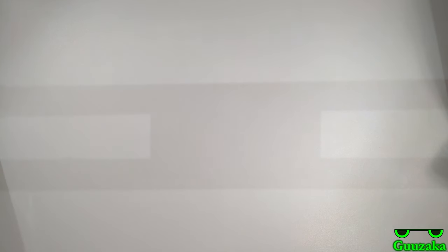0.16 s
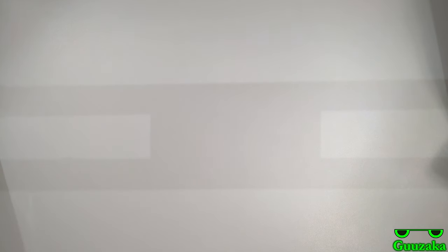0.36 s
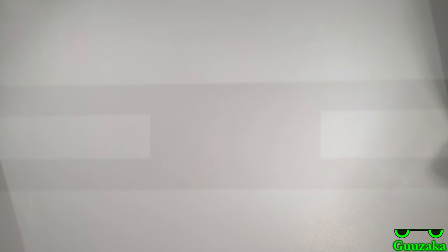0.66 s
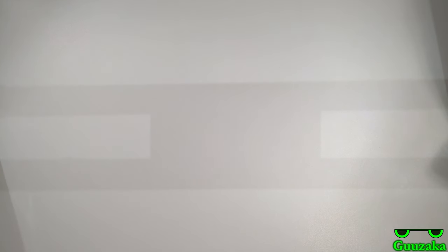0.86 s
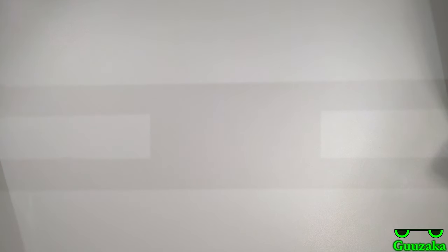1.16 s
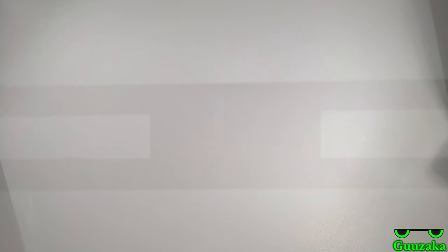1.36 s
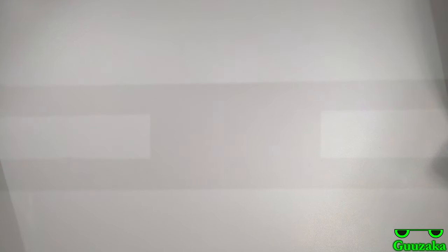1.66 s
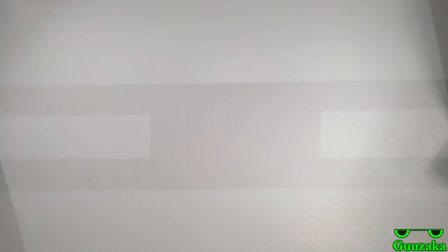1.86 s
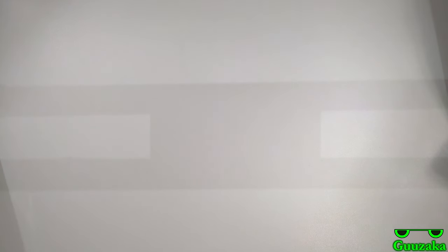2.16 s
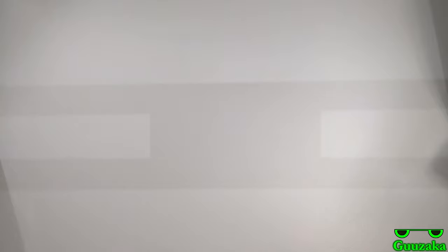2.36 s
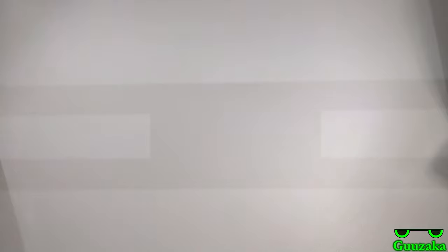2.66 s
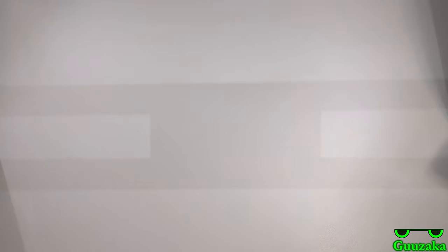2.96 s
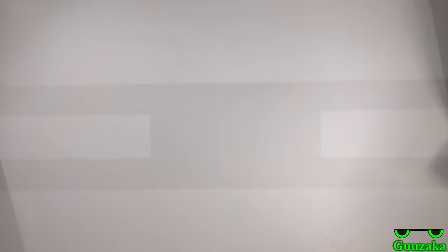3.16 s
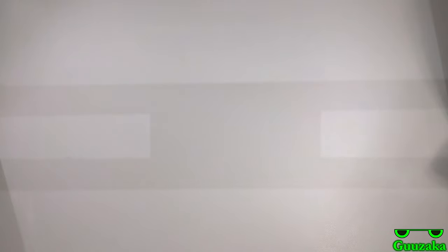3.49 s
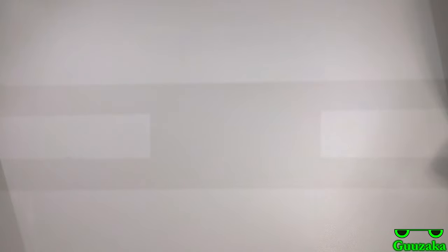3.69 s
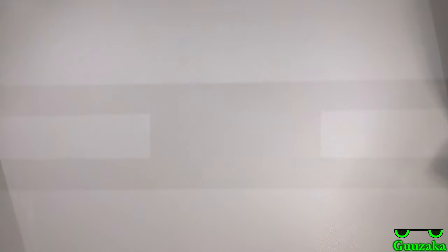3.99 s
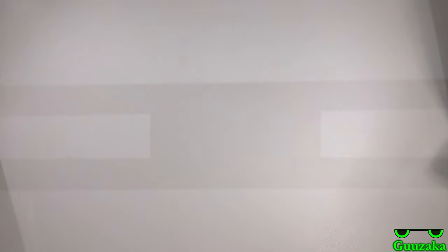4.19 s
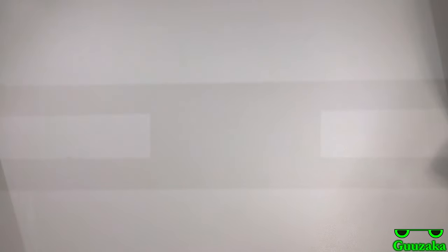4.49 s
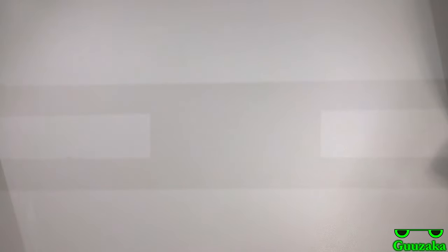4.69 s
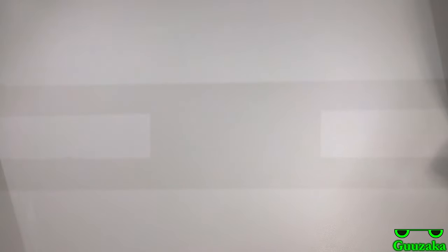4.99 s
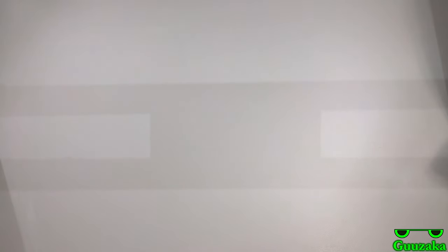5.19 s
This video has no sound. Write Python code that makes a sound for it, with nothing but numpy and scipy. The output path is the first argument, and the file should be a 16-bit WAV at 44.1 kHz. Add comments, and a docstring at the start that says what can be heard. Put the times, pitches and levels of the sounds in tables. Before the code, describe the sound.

Close, dry rustle and tapping of hollow card boxes, quiet at first, a loud thud midway, then a flurry of knocks.

```python
"""Cardboard boxes on a table

Close stereo microphone in a small room; the boxes are handled on a table a little to its right.
Card slides and scuffs over card: filtered grains of noise that follow each stroke of the hand.
Fingers and corners bump the hollow walls, and one box lands with a heavy, rattling thump: damped modes
of box and table with short bursts of grains. Brief squeaks, a low murmur and faint room air lie beneath."""
import sys
import numpy as np
from scipy import signal
from scipy.fft import rfft, irfft
from scipy.io import wavfile

SR = 44100
rng = np.random.default_rng(int(sys.argv[2]) if len(sys.argv) > 2 else 0)


def put_to_file(sound):
    """Save the sound as 16-bit audio at rate SR, in the file named by the first command-line argument."""
    columns = np.atleast_2d(sound).T  # one column per channel
    safe = np.clip(columns, -1, 1)
    whole_steps = np.round(safe * 32767)
    wavfile.write(sys.argv[1], SR, whole_steps.astype(np.int16))


N = 235714
TIME = np.arange(N) / SR


def undb(db):
    """Decibels to gain."""
    return 10 ** (np.asarray(db) / 20)


def along(points, hz):
    """Read (Hz, value) points on a log-frequency axis."""
    point_hz, value = np.transpose(points)
    return np.interp(np.log(np.maximum(hz, 1)), np.log(point_hz), value)


def colour(x, points, size=2048):
    """Causal minimum-phase filter of the given colour that keeps the power of white noise."""
    log_gain = along(points, np.fft.rfftfreq(size, 1 / SR)) * np.log(10) / 20
    cepstrum = irfft(log_gain)
    # folding the cepstrum forward in time makes the filter causal
    cepstrum[1:size // 2] *= 2
    cepstrum[size // 2 + 1:] = 0
    response = irfft(np.exp(rfft(cepstrum)))
    response /= np.linalg.norm(response)
    return signal.fftconvolve(x, response[None])[:, :x.shape[1]]


def place(x, pan_db):
    """Share a sound between left and right; pan_db is left minus right."""
    gains = np.array([undb(pan_db / 2), undb(-pan_db / 2)]).reshape(2, -1)
    return x * gains / gains.mean(axis=0)


def add(track, start_s, x):
    """Mix x into the track from start_s on."""
    i = max(int(start_s * SR), 0)
    track[:, i:i + x.shape[1]] += x[:, :max(N - i, 0)]


def walk(rate):
    """Smooth random wandering, spread near 1, with `rate` new values a second."""
    knots = rng.standard_normal(N // 20)
    return np.interp(TIME * rate, np.arange(len(knots)), knots)


def grains(count, spread_db):
    """Dense tiny slips of paper fibres, a few far larger than the rest; rms 1."""
    size_db = spread_db * np.minimum(rng.exponential(size=count), 6)
    x = rng.standard_normal(count) * undb(size_db)
    return x / x.std()


def ring(hz, db, t60, t, rise_s):
    """Damped modes set going by a soft push; unit power before the decay and the push."""
    gain = undb(db)[:, None]
    decay = np.exp(-np.log(1000) * t / t60[:, None])
    waves = gain * np.sin(2 * np.pi * hz[:, None] * t) * decay
    push = 1 - np.exp(-t / rise_s)
    return waves.sum(axis=0) * push / np.sqrt(np.sum(gain ** 2) / 2)


def diffuse(count, alike_hz):
    """Noise from all round: the two ports share its bass but not its treble."""
    mid, side = rfft(rng.standard_normal((2, count)))
    alike = 1 / (1 + (np.fft.rfftfreq(count, 1 / SR) / alike_hz) ** 2)
    mid = mid * np.sqrt((1 + alike) / 2)
    side = side * np.sqrt((1 - alike) / 2)
    return irfft(np.array([mid + side, mid - side]), count)


def room(x, wet_db, lowest_hz=140, size=256):
    """Direct sound and a short dense tail from near, bare walls."""
    # decay time of the tail: band_hz, t60_s
    room_t60 = [(100, 0.28), (500, 0.13), (2000, 0.17), (5000, 0.17), (15000, 0.18)]
    hz, t, bands = signal.stft(diffuse(SR // 2, alike_hz=417), SR, nperseg=size)
    decay = np.exp(-np.log(1000) * t / along(room_t60, hz)[:, None])
    tail = signal.istft(bands * decay, SR)[1]
    tail *= 1 - np.exp(-np.arange(tail.shape[1]) / SR / 0.00092)  # builds up with a time constant near 1 ms
    # the room is too small to scatter the deepest bass
    tail = signal.sosfilt(signal.butter(2, lowest_hz, "high", fs=SR, output="sos"), tail)
    response = undb(wet_db) * tail / np.linalg.norm(tail[0])
    response[:, 0] += 1  # direct sound
    return signal.fftconvolve(x, response / np.linalg.norm(response[0]), axes=1)[:, :N]


def spread(source, wet_db, count=3):
    """A box touches at several spots, each with its own path through the room."""
    return sum(room(source(), wet_db) for _ in range(count)) / np.sqrt(count)


def still_air(level_db=-66.5):
    """Still room air: faint steady noise from all round, fuller in the bass than in the treble."""
    # colour of the air: band_hz, relative_density_db
    air_colour = [(15, -44), (25, 0.5), (116, -5), (537, -11), (666, -12.5), (871, -19), (1410, -20),
                  (2560, -22.5), (3090, -23), (3340, -21.5), (6730, -26.5), (15500, -25)]
    return undb(level_db) * colour(diffuse(N, alike_hz=473), air_colour)


def grip(murmur_db=1, waver_db=3):
    """Skin creeps on the card in fits and starts; only the low walls pass it on."""
    # murmur of the held box, before murmur_db and the wavering: time_s, level_db
    hold_levels = [(0.0, -59.5), (0.37, -61.5), (0.86, -74.5), (1.04, -66), (1.27, -62.5), (2.5, -86),
                   (3.19, -71), (3.32, -72), (3.44, -64), (3.49, -62.5), (3.8, -68), (4.02, -80),
                   (4.2, -63), (4.33, -62), (4.62, -45), (4.85, -71), (5.03, -86), (5.25, -74)]
    # what the walls pass on: band_hz, relative_level_db
    murmur_colour = [(25, 1.5), (70, 1.5), (110, -10.5), (170, -1.5), (250, -6), (380, -16), (700, -23),
                     (2000, -44)]
    pressure_db = np.interp(TIME, *np.transpose(hold_levels)) + murmur_db + waver_db * walk(rate=20)
    creep = undb(pressure_db) * grains(N, spread_db=6.5)
    return colour(place(creep, 0), murmur_colour)


def squeaks():
    """A fingertip sticks and slips quickly on glossy card, singing in a few narrow bands."""
    # squeaks: start_s, level_db, length_s
    squeak_times = [(2.773, -52.5, 0.043), (2.925, -83, 0.026)]
    # narrow resonances: centre_hz, width_hz, relative_level_db
    squeak_tones = [(2430, 1700, -2), (4130, 530, -1), (4880, 1300, -2.5), (12850, 540, -1.5)]
    hz = np.fft.rfftfreq(N, 1 / SR)
    shape = sum(undb(db) / (1 + (2 * (hz - centre) / width) ** 2) for centre, width, db in squeak_tones)
    song = irfft(rfft(rng.standard_normal(N)) * shape, N)
    press = sum(undb(db) * np.sin(np.pi * np.clip((TIME - start) / length, 0, 1))
                for start, db, length in squeak_times)
    return place(press * song / song.std(), -2.5)


def stroke(attack, hold, release):
    """The hand speeds up, holds its speed and lets the motion die away."""
    t = TIME[TIME < attack + hold + release]
    rise = np.sin(np.pi / 2 * np.minimum(t / attack, 1)) ** 2
    return rise * np.exp(-np.log(1000) * np.maximum(t - attack - hold, 0) / release)


def slides(rasp_db=0, hollow_db=-1, hiss_db=0, judder_db=-1.5):
    """Card drags unevenly over card: fibres rasp and hiss, and the hollow box resounds at its opening's pitch."""
    # strokes of card on card, levels before the trims above: start_s, attack_s, hold_s, release_t60_s,
    # rasp_db, hollow_db, hollow_pitch_hz, fine_hiss_db, left_minus_right_db
    strokes = [(0, 0.0033, 0.1, 0.31, -64, -68.5, 890, -66, -2),
               (0.119, 0.061, 0.027, 0.23, -53, -52, 1170, -54.5, -2),
               (0.196, 0.065, 0.053, 0.13, -58, -53.5, 980, -61, 0.5),
               (0.429, 0.011, .11, 0.25, -64, -91, 890, -50.5, 0),
               (.482, 0.011, 0.014, 0.12, -59, -52.5, 810, -57, 0),
               (0.648, 0.021, .005, 0.19, -67, -43.5, 940, -61, -3),
               (0.712, 0.041, 0.0046, 0.31, -53.5, -69, 890, -61.5, -1),
               (0.821, 0.037, .015, 0.68, -50.5, -66.5, 885, -52.5, -1),
               (0.945, 0.28, 0.052, 1.1, -58, -66, 900, -58.5, -2),
               (1.333, 0.32, 0.38, .15, -64, -75, 890, -65, -4),
               (1.72, 0.11, 0.033, 0.36, -58, -73, 890, -71, 2),
               (1.926, 0.039, 0.011, .15, -67, -80, 890, -68, 1),
               (2.003, 0.13, 0.063, 0.67, -70.5, -73, 870, -71.5, -1),
               (2.384, 0.037, 0.0085, 0.27, -52.5, -49.5, 960, -54, -3.5),
               (2.84, 0.046, 0.018, 0.55, -79, -68.5, 940, -76, 1),
               (3.273, 0.033, .005, 0.093, -43.5, -30.5, 1010, -34, 1.5),
               (3.308, 0.036, .005, 0.16, -41.5, -34.5, 1020, -60, 5),
               (3.466, 0.032, .01, 0.27, -62.5, -69, 890, -71, 0),
               (3.532, 0.037, 0.0089, .22, -55, -43, 940, -51.5, -1.5),
               (3.682, 0.12, .1, 0.36, -60, -53, 930, -56, -3.5),
               (3.762, 0.081, .03, 0.23, -47.5, -49, 1050, -43, 1),
               (3.977, 0.037, 0.0069, 0.084, -65, -51.5, 940, -58, -3),
               (4.133, .03, 0.31, .3, -65, -58, 816, -66, -1),
               (4.249, 0.027, .015, 0.11, -59, -44, 810, -77, 5),
               (4.454, 0.063, 0.09, 0.34, -56, -52, 845, -65, -3),
               (4.541, 0.09, 0.014, 0.35, -49, -42, 820, -45.5, 1),
               (4.679, 0.011, 0.0042, 0.14, -59, -61, 855, -40.5, -2),
               (4.793, 0.04, 0.24, 0.71, -74, -78.5, 850, -69, 0.5),
               (5.206, 0.043, 0.0045, 0.15, -63, -61.5, 900, -59.5, -3)]
    # colours of rasp, hollow box (as it sounds at hollow_ref_hz) and hiss: band_hz, relative_level_db
    rasp_colour = [(500, -37.5), (1400, -6), (2200, 0.5), (3600, 2.5), (5200, 0), (7000, -6), (10000, -16),
                   (16000, -44)]
    hollow_colour = [(120, -8), (300, -12), (500, -6.5), (720, 3.5), (890, 4.5), (1020, 1), (1140, 2.5),
                     (1400, -4), (2200, -11.5), (5000, -34.5)]
    hiss_colour = [(2500, -32), (6000, -4.5), (8000, -4.5), (10500, -1.5), (12800, 1.5), (15500, -1.5)]
    hollow_ref_hz = 890
    out = np.zeros((2, N))
    drag = undb(judder_db * walk(rate=150))
    fibres = [drag * grains(N, spread_db=6.0) for _ in range(3)]
    for start, attack, hold, release, coarse_db, box_db, box_hz, fine_db, pan_db in strokes:
        speed = stroke(attack, hold, release)
        span = (int(start * SR) + np.arange(len(speed))) % N
        hollow = np.array(hollow_colour) * [box_hz / hollow_ref_hz, 1]
        voices = [(rasp_colour, coarse_db + rasp_db),
                  (hollow, box_db + hollow_db),
                  (hiss_colour, fine_db + hiss_db)]
        rub = sum(colour(undb(db) * speed * slips[None, span], shape)
                  for slips, (shape, db) in zip(fibres, voices))
        add(out, start, place(rub, pan_db))
    return out


def blows():
    """Each knock is a first contact and a second some 9 to 40 ms later, often much weaker."""
    # knocks, levels of the first contact before later trims: start_s, wall_db, thud_db, clack_db,
    # clack_pitch_hz, tick_db, second_delay_s, second_minus_first_db (before the shifts below)
    knocks = [(.116, -53, -60, -65, 520, -59, 0.016, -12), (.25, -55, -50, -70, 520, -70, 0.021, -4),
              (.337, -44.5, -59, -53, 530, -59.5, 0.012, -28), (0.546, -59, -48, -80, 600, -78, 0.015, -9),
              (.66, -44.5, -47, -41.5, 930, -44.5, 0.023, 2), (0.826, -54, -67, -72, 600, -66, 0.013, -16),
              (1.05, -48, -45, -42, 780, -33, 0.02, -2.5), (1.207, -39, -33.5, -47.5, 850, -63, .019, 4),
              (1.361, -43.5, -60.5, -57.5, 704, -80, .014, -10), (1.946, -53, -82, -68, 585, -63, .03, 1),
              (2.17, -57.5, -72, -67, 553, -78, 0.023, -5), (2.333, -44, -52.5, -55, 670, -50, 0.022, 2.5),
              (2.74, -56, -49.5, -56.5, 1030, -65.5, 0.021, 0.5),
              (2.795, -62, -49.5, -70, 900, -63, .016, -7.5),
              (2.9, -55.5, -60.5, -69, 700, -80, 0.015, -9.5), (3.047, -50.5, -80, -68, 495, -77, .014, -5),
              (3.094, -58, -55, -62.5, 750, -62.5, 0.012, -6.5),
              (3.276, -21.5, -26, -39.5, 556, -49, 0.0089, 6),
              (3.297, -10.5, -16, -22.5, 910, -35, 0.0087, -3.5),
              (3.319, -19, -24.5, -32, 890, -31, .018, 0.5), (3.384, -35, -23, -45, 680, -42.5, .04, -10.5),
              (3.549, -42, -43.5, -42, 944, -40, .014, 4.5),
              (3.664, -43.5, -58, -58, 700, -60, 0.013, -6.5), (3.8, -47.5, -79, -57, 495, -69, 0.016, -16),
              (4.145, -36.5, -41.5, -44.5, 660, -52, .019, 3),
              (4.222, -42, -47, -39.5, 600, -61, 0.019, -3),
              (4.277, -31.5, -39.5, -29.5, 640, -53.5, .014, -10),
              (4.344, -62, -36.5, -70, 600, -71, 0.017, -8),
              (4.382, -31, -35, -45.5, 685, -76, .014, -10.5),
              (4.427, -39.5, -68, -49.5, 625, -75, 0.015, -13),
              (4.54, -25.5, -35.5, -35.5, 540, -47.5, .018, -3.5),
              (4.624, -37.5, -35.5, -41, 704, -43.5, .014, -12),
              (4.689, -42, -36.5, -57, 700, -52, 0.015, -18),
              (4.728, -40.5, -33.5, -41.5, 720, -75, 0.016, -13),
              (4.777, -41.5, -53, -50.5, 670, -70, 0.015, -16),
              (5.223, -48, -40.5, -77.5, 700, -60, .014, -16),
              (5.279, -42.5, -42, -46.5, 550, -63, 0.011, -6), (5.31, -20, -40, -28.5, 534, -51, .014, -3)]
    flex_hz, flex_scatter = 59.8, 0.16  # mean pitch at which a box flexes, its spread from spot to spot (share)
    # the second contact has relatively more thud and less tick
    second_thud_db, second_clack_db, second_tick_db = 5, 1, -2.5
    rows = []  # (s, wall dB, thud dB, thud Hz, clack dB, clack Hz, tick dB)
    for start, wall_db, thud_db, clack_db, clack_hz, tick_db, delay, second_db in knocks:
        first_hz, second_hz = flex_hz * (1 + flex_scatter * rng.standard_normal(2))
        rows.append((start, wall_db, thud_db, first_hz, clack_db, clack_hz, tick_db))
        rows.append((start + delay, wall_db + second_db, thud_db + second_db + second_thud_db, second_hz,
                     clack_db + second_db + second_clack_db, clack_hz, tick_db + second_db + second_tick_db))
    return rows


def contacts(clack_db=3, tick_db=3, clack_s=0.01, tick_s=0.01, pan_db=-2):
    """Card crunches briefly where it is struck: a dull clack and a sharp tick."""
    # colour of a clack: multiple_of_its_pitch, relative_level_db
    clack_colour = [(.3, -10), (.65, -7), (1, 1.5), (1.45, -5), (2.1, -14.5), (4, -20), (9, -46.5)]
    # colour of a tick: band_hz, relative_level_db
    tick_colour = [(700, -24), (1500, -2), (2300, 2.5), (3400, 0), (5000, -4.5), (8000, -12), (11000, -16),
                   (15500, -20.5)]
    out = np.zeros((2, N))
    t = np.arange(SR // 8) / SR
    for start, _, _, _, dull_db, clack_hz, sharp_db in blows():
        clack = undb(dull_db + clack_db) * grains(len(t), spread_db=2.5) * np.exp(-t / clack_s)
        tick = undb(sharp_db + tick_db) * grains(len(t), spread_db=7.5) * np.exp(-t / tick_s)
        dull = colour(place(clack, pan_db), np.array(clack_colour) * [clack_hz, 1])
        sharp = colour(place(tick, pan_db), tick_colour)
        add(out, start, dull + sharp)
    return out


def bodies(flex_s=0.012, flex_db=-1, table_db=-3.0, wall_db=-3, wall_t60=0.14, scatter_db=4.5,
           detune=0.013, hardness=0.27, soft_db=-10):
    """Each blow flexes the box, shakes the table and rings the hollow walls."""
    # hollow box, before tilt, scatter and detuning: mode_hz, relative_level_db
    box_modes = [(146, 2.5), (189, -0.5), (229, 1), (262, -3), (291, -6), (358, -4.5), (404, -4.5),
                 (487, -8.5), (545, -10), (623, -10.5), (714, -10.5), (800, -12.5), (952, -30),
                 (1148, -29.5)]
    # table top: mode_hz, relative_level_db, t60_s
    table_modes = [(63.5, 0, .45), (80.5, -6, .3), (147, -13, .24)]
    out = np.zeros((2, N))
    t = np.arange(SR // 2) / SR
    table = ring(*np.transpose(table_modes), t, rise_s=0.011)
    mode_hz, mode_db = np.transpose(box_modes)
    octaves = np.log2(mode_hz / mode_hz[0])
    t60 = wall_t60 * 0.98 ** octaves  # card damps its upper modes sooner
    for start, ring_db, thud_db, thud_hz, clack_db, _, _ in blows():
        flex = np.sin(2 * np.pi * thud_hz * t) * t / flex_s * np.exp(1 - t / flex_s)
        # harder blows reach the upper modes; spot and hold shift their weights and pitches
        tilt_db = hardness * (clack_db - ring_db - soft_db) * octaves
        spot, hold = rng.standard_normal((2, len(octaves)))
        swing = rng.choice([-1, 1], len(octaves))  # each mode starts inwards or outwards
        wall_hz = swing * mode_hz * (1 + detune * hold)
        walls = ring(wall_hz, mode_db + tilt_db + scatter_db * spot, t60, t, rise_s=0.0014)
        thud = undb(flex_db) * flex + undb(table_db) * table
        add(out, start, place(undb(thud_db) * thud + undb(ring_db + wall_db) * walls, 0))
    return out


def scene():
    """Knocks, slides, squeaks and the murmur of the grip in the room, over faint still air."""
    air = still_air()
    murmur_and_bodies = room(bodies() + grip(), wet_db=-2)
    crunches = spread(contacts, wet_db=9.5)
    rubbing = spread(slides, wet_db=7.0)
    return murmur_and_bodies + crunches + rubbing + room(squeaks(), wet_db=6) + air


def record(dry):
    """The left port lies in the treble shadow of the microphone housing; the top is cut steeply."""
    # response of the shaded left port: band_hz, gain_db
    shade = [(200, 1), (1200, -4), (4000, -2.5), (8000, -6), (15000, -13)]
    top_hz = 15900
    shaded = irfft(rfft(dry[0]) * undb(along(shade, np.fft.rfftfreq(N, 1 / SR))), N)
    top_cut = signal.ellip(10, .2, 70, top_hz, fs=SR, output="sos")
    return signal.sosfilt(top_cut, np.array([shaded, dry[1]]))


dry = scene()
out = record(dry)
put_to_file(out)
```